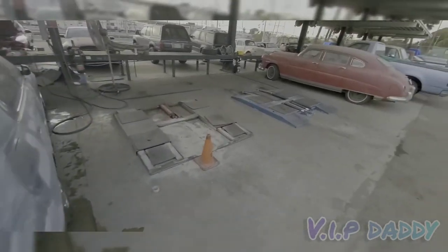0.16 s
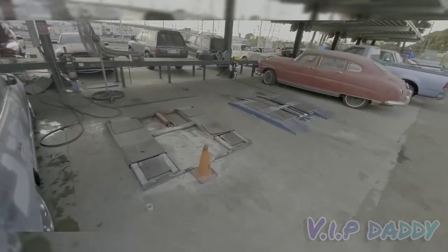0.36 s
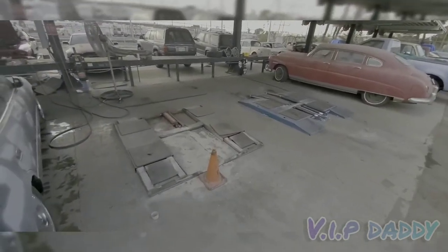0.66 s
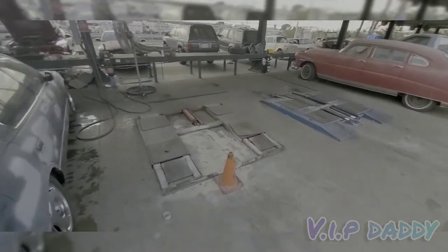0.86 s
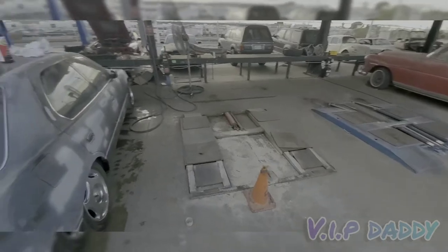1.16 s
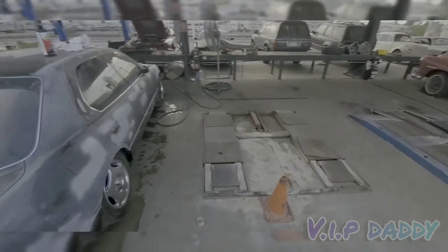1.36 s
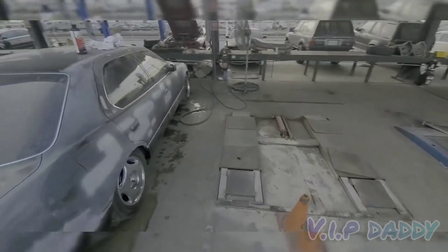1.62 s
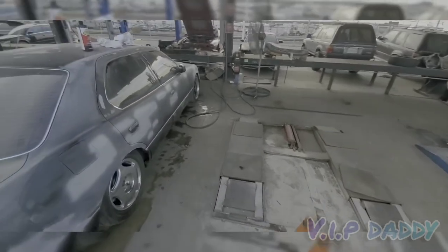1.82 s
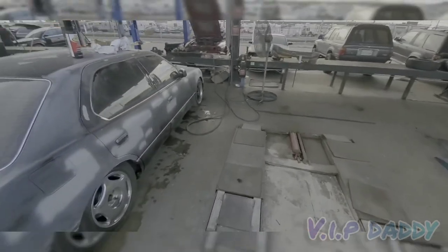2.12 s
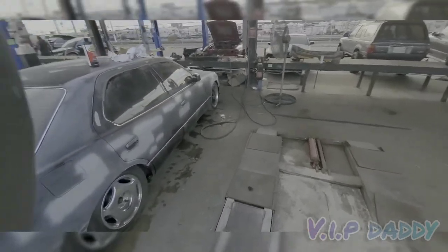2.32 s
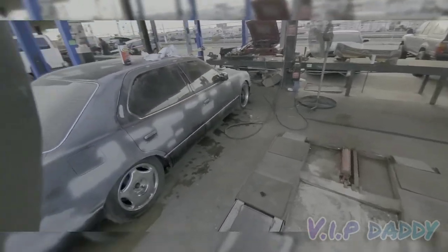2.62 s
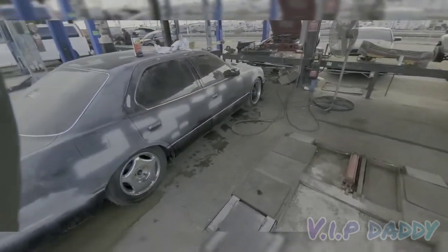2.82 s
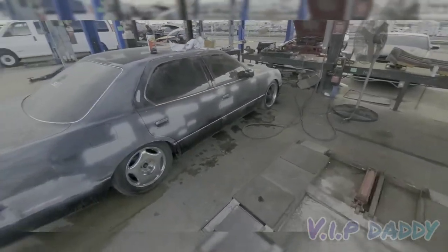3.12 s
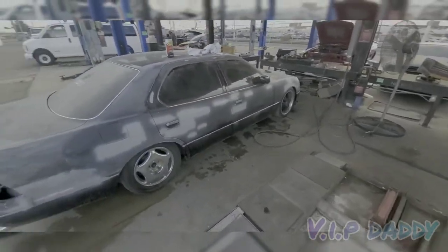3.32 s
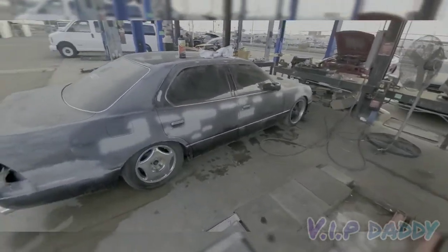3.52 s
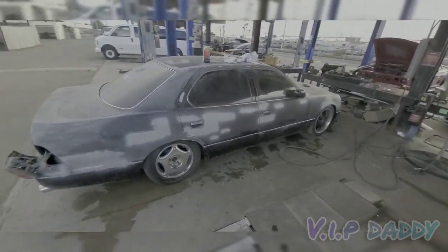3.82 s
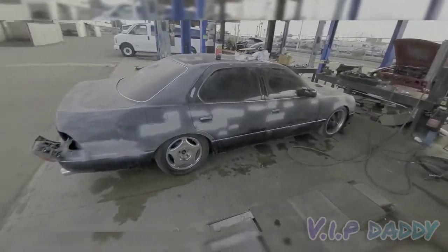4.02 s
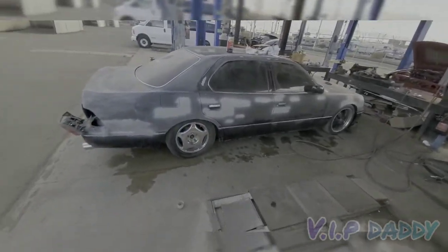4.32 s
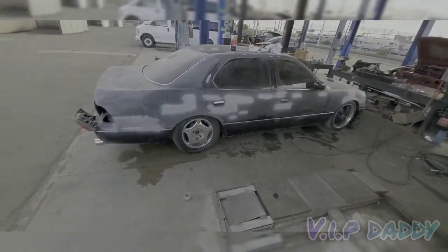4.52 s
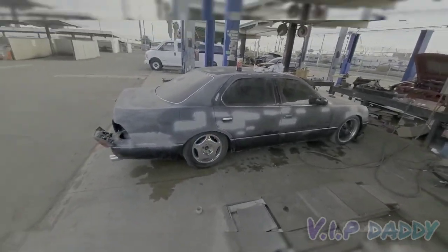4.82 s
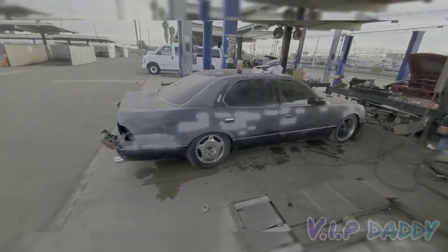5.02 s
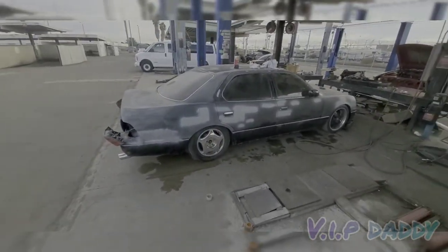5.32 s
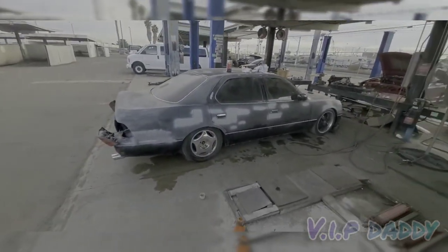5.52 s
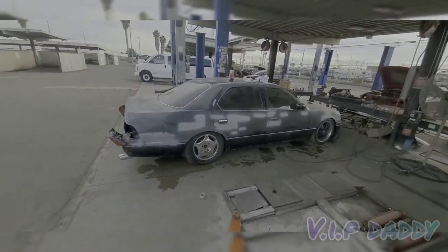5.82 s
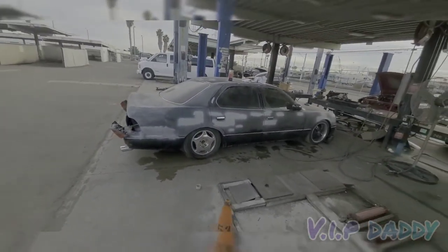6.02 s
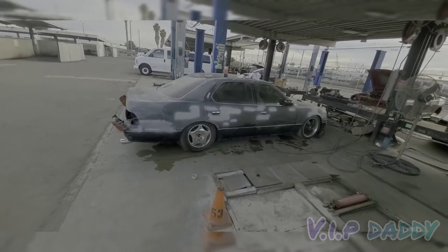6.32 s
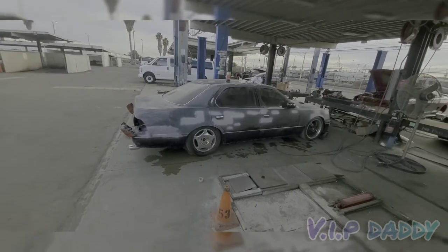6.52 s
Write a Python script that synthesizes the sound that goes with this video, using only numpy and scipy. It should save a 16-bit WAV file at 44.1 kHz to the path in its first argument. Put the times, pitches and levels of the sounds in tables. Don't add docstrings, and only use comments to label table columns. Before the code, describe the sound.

A continuous hiss of escaping compressed air fills the whole 6.7 seconds, dense, bright and sizzling, heard by a walking listener with a microphone at each ear in an open-sided workshop. At first its treble favours the left ear; from about 1 to 3 s the turning head swings it through the centre, and by 3.5 s it leans right. Its colour shifts subtly, with hollow comb-like sweeps from nearby panels, most active between 2.4 and 3.5 s. A barely audible shoe brush occurs at 1.1 s, a longer heavy gritty drag swells from 3.0 to 3.4 s, then short scrapes follow at 4.2 s and, towards the left, 4.5 s. Underneath, a distant machine drones very low, rising and falling irregularly, amid soft traffic rumble that slowly fades and a faint airy wash. The deepest air stirs slightly after 5 s; the hiss continues to the end.

```python
import sys
import numpy as np
from scipy import signal
from scipy.fft import rfft, irfft
from scipy.io import wavfile
from scipy.ndimage import uniform_filter1d, map_coordinates

SR = 44100
rng = np.random.default_rng(int(sys.argv[2]) if len(sys.argv) > 2 else 0)


def voltage_ratio(level):
    return 10 ** (np.asarray(level, float) / 20)


def store_pcm(level_fs):
    pcm = np.round(np.clip(level_fs, -1, 1) * 32767).astype(np.int16)
    wavfile.write(sys.argv[1], SR, np.atleast_2d(pcm).T)


N = 293706

FRAME, HOP = 2048, 256
HZ = np.fft.rfftfreq(FRAME, 1 / SR)[:, None]
FINE_HZ = np.fft.rfftfreq(N, 1 / SR)
TIME = np.arange(-(-N // HOP) + 1) * HOP / SR
SECONDS = np.arange(N) / SR

# t/s, left ear's lag/ms, left ear turned away/0-1, right ear turned towards/0-1
HEAD_TURN = [(0, -.29, 0, 0), (.7, -.27, 0, 0), (1.0, -.19, 0, 0), (1.5, .01, 0, 0), (2.2, .09, 0, 0),
             (2.9, .27, 0, 0), (3.0, .33, .25, 0), (3.3, .44, 1, .4), (3.5, .47, 1, .5), (4.2, .52, 1, .5),
             (4.7, .53, 1, .5), (4.9, .51, 1, 1), (6.66, .47, 1, 1)]
# t/s, drone level/dB
DRONE_LEVEL = [(0, -36), (.2, -34), (.55, -39), (.9, -34.5), (1.3, -40.5), (1.5, -34.5), (1.85, -43),
               (2.4, -41), (2.8, -42), (3.1, -34.5), (3.3, -46), (3.5, -38.5), (3.85, -45), (4.45, -38),
               (4.75, -41), (5.05, -36.5), (5.8, -36.5), (6.66, -38)]


def along(points, hz=HZ):
    f, *columns = np.transpose(points)
    return [np.interp(np.log(hz + 1), np.log(f + 1), column) for column in columns]


def curves(rows):
    s, *columns = np.transpose(rows)
    return [np.interp(TIME, s, column) for column in columns]


def white(channels):
    noise = rng.standard_normal((channels, N))
    return signal.stft(noise, nperseg=FRAME, noverlap=FRAME - HOP)[2]


def sound(spectra):
    return signal.istft(spectra, nperseg=FRAME, noverlap=FRAME - HOP)[1][..., :N]


def patches(width_hz, seconds):
    field = rng.standard_normal((2, len(HZ), len(TIME)))
    field = uniform_filter1d(field, max(int(width_hz * FRAME / SR), 1), 1)
    field = uniform_filter1d(field, max(int(seconds * SR / HOP), 1), 2)
    return field / field.std()


def flutter(rate):
    knots = rng.standard_normal((2, 400))
    return np.array([map_coordinates(k, [SECONDS * rate]) for k in knots])


def delay(ms):
    return np.exp(-2j * np.pi * HZ * ms / 1000)


def bump(centre_hz, width_hz, db):
    return db * np.exp(-.5 * ((HZ - centre_hz) / width_hz) ** 2)


def leak():
    # t/s, hiss level/dB, extra sizzle near the jet's axis/dB
    walk = [(0, -2, 1.5), (.6, -2.5, 1.5), (1.1, -1.8, 3), (1.5, -0.5, 0.5), (1.78, -1, 2.5),
            (2.1, 0.3, 0.5), (2.42, 2.3, -1.5), (2.85, -1.1, 3), (3.08, 1.6, -0.5), (3.3, .4, -1.5),
            (3.55, 0.3, 2), (3.9, -0.14, 3), (4.6, 0, 1), (4.9, -0.2, 0), (5.25, -0.3, .5), (5.5, -0.4, 2),
            (6.3, .8, 1), (6.66, 0, 0)]
    # t/s, shoulder delay/ms, shoulder strength/0-1, car flank delay/ms
    echoes = [(0, .66, .1, 2.4), (1.1, .68, .12, 2.5), (1.17, .695, .45, 2.6), (1.4, .785, .45, 2.8),
              (1.5, .82, .15, 2.7), (2.6, .95, .1, 2.3), (3.0, .8, .1, 2.0), (3.6, .74, .12, 1.85),
              (5, .84, .12, 2.4), (6.66, .8, .1, 3.4)]
    # f/Hz, share of the hiss common to both ears/0-1
    common = [(1200, .5), (2200, .58), (4000, .46), (7000, .38), (10000, .29), (12500, .42), (15500, .33)]
    # f/Hz, level facing the leak/dB, level after turning/dB
    left_colour = [(1200, -29.4, -30.0), (1800, -32.8, -28.5), (2400, -25.4, -26.8), (3200, -22.7, -31.1),
                   (4000, -21.4, -25.4), (5000, -19.3, -23.8), (6000, -19.6, -21.1), (7000, -18.0, -18.1),
                   (7800, -24.5, -23.0), (9000, -26.2, -24.8), (10500, -25.3, -23.6), (12000, -19.4, -19.7),
                   (13500, -14.0, -15.4), (15500, -12.5, -17.8)]
    right_colour = [(1200, -29.4, -31.0), (1800, -34.4, -33.5), (2400, -26.7, -26.2), (3200, -26.9, -22.4),
                    (4000, -24.8, -19.1), (5000, -19.8, -19.1), (6000, -19.8, -21.3), (7000, -19.6, -21.0),
                    (7800, -23.8, -21.9), (9000, -25.9, -25.2), (10500, -25.2, -23.8),
                    (12000, -19.6, -19.0), (13500, -20.3, -20.0), (15500, -21.6, -22.4)]

    lag, *turned = curves(HEAD_TURN)
    strength_db, axis_db = curves(walk)
    shoulder_ms, shoulder, flank_ms = curves(echoes)
    jet, *scatter = white(channels=3)
    share = np.clip(along(common)[0], 0, 1)
    sizzle = 1 / (1 + np.exp((10300 - HZ) / 500))

    shadow = 1 / (1 + np.exp((lag + 0.12) / .03))
    body_db, sizzle_db = -0.1 * shadow, 5.5 * shadow + 0.5
    lean_db = body_db * (1 - sizzle) + sizzle_db * sizzle

    ears = []
    for ear, colour in enumerate((left_colour, right_colour)):
        facing, away = along(colour)
        db = facing + (away - facing) * np.clip(turned[ear], 0, 1)
        db = db + strength_db + axis_db * sizzle
        db = db + (1 - 2 * ear) * lean_db + glints(ear)
        direct = jet * delay(lag * (.5 - ear))
        shoulder_gain = shoulder * (.3 + .65 * sizzle) * (1 - .5 * ear)
        comb = 1 + shoulder_gain * delay(shoulder_ms + .06 * ear)
        comb = comb + .22 * delay(flank_ms - .3 * ear)
        mixed = np.sqrt(share) * direct + np.sqrt(1 - share) * scatter[ear]
        ears.append(voltage_ratio(db) * comb * mixed)

    paths_db = 1.7 * patches(width_hz=110, seconds=.35) + .6 * patches(width_hz=700, seconds=.12)
    above = HZ ** 4 / (HZ ** 4 + 1300 ** 4)
    hiss = sound(voltage_ratio(paths_db - 1.0) * above * np.array(ears))
    return hiss * voltage_ratio(0.2 * flutter(rate=14.0))


def lit(start, end):
    fade_s = 0.22
    arrive = np.clip((TIME - start) / fade_s + .5, 0, 1)
    leave = np.clip((TIME - end) / fade_s + .5, 0, 1)
    return arrive - leave


def glints(ear):
    # from t/s, to t/s, slide of the left glints/share of f, slide of the right/share of f
    places = [
        (-6, 1.34, -0.032, .01),
        (1.9, 2.87, 0.083, 0),
        (2.95, 4.9, -0.029, 0.08),
        (3, 7.5, -0.013, -0.012),
    ]
    # f/Hz, width/Hz, level/dB
    left_glints = [
        [(9500, 600, 3.5), (7900, 610, -4), (1960, 70, -8), (13400, 900, 1), (15500, 460, -1)],
        [(1850, 90, 2), (15400, 500, 4), (8000, 620, -3.5), (11100, 810, -4)],
        [(9500, 800, 1.4), (11700, 600, -2), (3200, 300, 3.5)],
        [(10100, 410, -4), (3200, 300, -2.5)],
    ]
    # f/Hz, width/Hz, level/dB
    right_glints = [
        [(1890, 70, -9), (14350, 600, -6), (11950, 500, 2), (4000, 520, 3)],
        [(1850, 90, -2), (1460, 60, 2)],
        [(10600, 1200, 5.5), (13300, 600, -1), (4970, 800, -3), (2870, 800, 3), (6800, 430, 1.5)],
        [(5700, 200, -2), (2690, 83, 0.5), (9600, 700, -1.5)],
    ]
    # from t/s, to t/s, from f/Hz, to f/Hz, level/dB
    passes = [
        (2.556, 3.523, 14900, 14400, 4),
        (2.803, 3.4, 11400, 8600, 4.5),
        (3.0, 5.3, 5250, 3860, -3.5),
    ]
    # f/Hz, width/Hz, level/dB
    capsule = (6770, 120, 1.6)

    db = np.zeros((len(HZ), len(TIME)))
    for (start, end, *slide), bands in zip(places, (left_glints, right_glints)[ear]):
        near = lit(start, end)
        on = near > 0
        moved = np.interp(TIME[on], [start, end], [1, 1 + slide[ear]])
        for hz, width_hz, level_db in bands:
            db[:, on] += near[on] * bump(hz * moved, width_hz, level_db)
    if ear == 0:
        db += bump(*capsule)
        for start, end, from_hz, to_hz, pass_db in passes:
            near = lit(start, end)
            on = near > 0
            centre = np.interp(TIME[on], [start, end], [from_hz, to_hz])
            db[:, on] += near[on] * bump(centre, 0.12 * centre, pass_db)
    return db


def scuffs():
    # from t/s, to t/s, level/dB, left over right/dB, rise/s
    drags = [
        (1.103, 1.2, -51, 3, .026),
        (2.98, 3.397, -36.5, 1, .19),
        (4.176, 4.334, -40, 0, 0.012),
        (4.506, 4.647, -44, 8, 0.023),
    ]
    # f/Hz, level/dB per Hz
    sole = [(250, -9), (600, 6), (900, 1.5), (1400, 5.5), (2000, 0.5), (3500, -15), (7000, -61)]

    colour = voltage_ratio(along([(1, -120)] + list(sole) + [(20000, -120)], FINE_HZ)[0])
    low = 1 / (1 + (FINE_HZ / 900) ** 4)
    grit = rng.standard_normal((3, N)) * voltage_ratio(2.2 * flutter(rate=24)[0])
    grit = rfft(grit[0] + 0.67 * grit[1:]) * colour
    bass, treble = irfft(grit * low, N), irfft(grit * (1 - low), N)
    out = np.zeros((2, N))
    for start, end, db, pan_db, rise in drags:
        length = end - start
        swell = (SECONDS - start) / rise
        lift = (end - SECONDS) / (0.32 * length)
        stroke = np.clip(np.minimum(swell, lift), 0, 1)
        gain = voltage_ratio(db + pan_db * np.array([[.5], [-.5]]))
        rasp = voltage_ratio(-12 + 25 * length) * bass + treble
        out += stroke * gain * rasp / treble.std()
    return out


def machine():
    # f/Hz, width/Hz, level/dB
    hums = [(82, 10.4, -9), (81.5, 42.3, -10)]
    power = sum(voltage_ratio(2 * db) / (1 + ((FINE_HZ - hz) / (width / 2)) ** 2) ** 2 for hz, width, db in hums)
    mid, side = irfft(rfft(rng.standard_normal((2, N))) * np.sqrt(power), N)
    hum = mid + voltage_ratio(-19) * np.array([side, -side])
    drone_db, = curves(DRONE_LEVEL)
    return hum / hum.std() * voltage_ratio(2.0 + np.interp(SECONDS, TIME, drone_db))


def diffuse(spectrum, level_db):
    # f/Hz, left-right likeness/-1 to 1
    likeness = [(60, .945), (130, .985), (200, .98), (320, .93), (640, .25), (1400, -.35), (3000, 0)]
    colour = voltage_ratio(along([(1, -120)] + list(spectrum) + [(20000, -120)])[0])
    turn = np.arccos(np.clip(along(likeness)[0], -1, 1)) / 2
    mid, side = white(channels=2) * colour / np.sqrt(np.mean(colour ** 2))
    mid, side = mid * np.cos(turn), side * np.sin(turn)
    return voltage_ratio(level_db) * np.array([mid + side, mid - side])


def yard():
    # f/Hz, level/dB per Hz
    deep = [(8.8, -48), (15, -22), (70, 6), (91, -26), (150, -120)]
    # f/Hz, level/dB per Hz
    rumble = [(59, -35), (100, -5.5), (135, -9), (182, -6.5), (259, -13), (323, -9.5), (361, -13),
              (406, -9.5), (520, -21.5), (680, -39), (1140, -120)]
    # f/Hz, level/dB per Hz
    wash = [(280, -22), (480, -1.5), (584, -4), (904, -3.5), (1070, -4.5), (1490, -2.5), (1710, -11),
            (1900, -9), (2470, -2.5), (4180, -120)]

    drone_db, = curves(DRONE_LEVEL)
    drone_swell_db = drone_db - drone_db.mean()
    gust_db = 2 * np.clip((TIME - 4.9) / 0.83, 0, 1)
    deep_db = -42.4 + 0.091 * drone_swell_db + gust_db
    rumble_db = -37.66 + 0.12 * drone_swell_db - 0.66 * TIME
    wash_db = -41 - 2 * curves(HEAD_TURN)[1]
    air = diffuse(deep, deep_db) + diffuse(rumble, rumble_db) + diffuse(wash, wash_db)
    return sound(air * voltage_ratio(2.2 * patches(width_hz=60, seconds=.16)[0]))


def scene():
    return leak() + scuffs() + machine() + yard()


def band_limit(x):
    return signal.sosfilt(signal.butter(12, 15870, fs=SR, output="sos"), x)


def record(dry):
    limited = irfft(rfft(dry) * (FINE_HZ < 15740), N)
    return band_limit(limited)


dry = scene()
out = record(dry)
store_pcm(out)
```